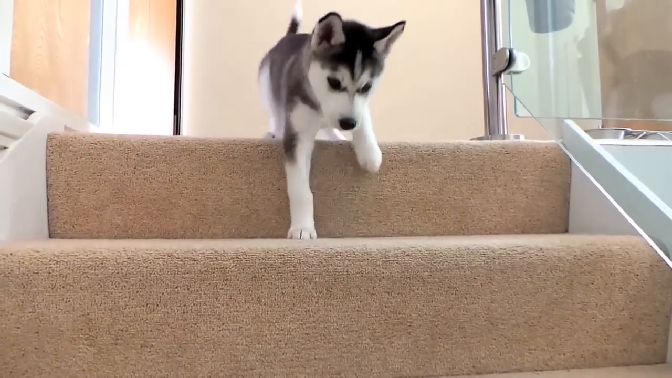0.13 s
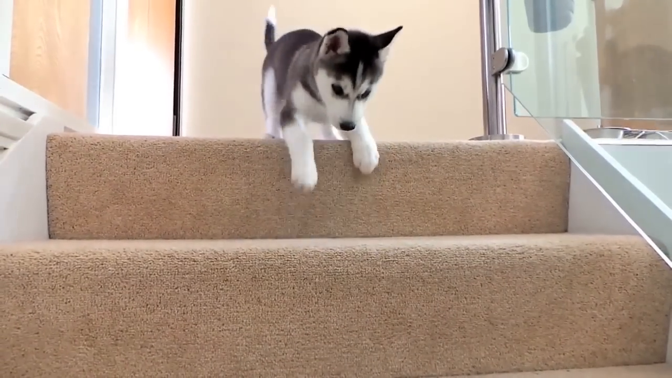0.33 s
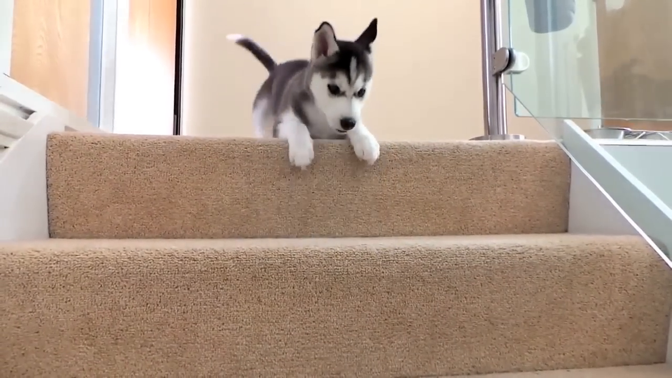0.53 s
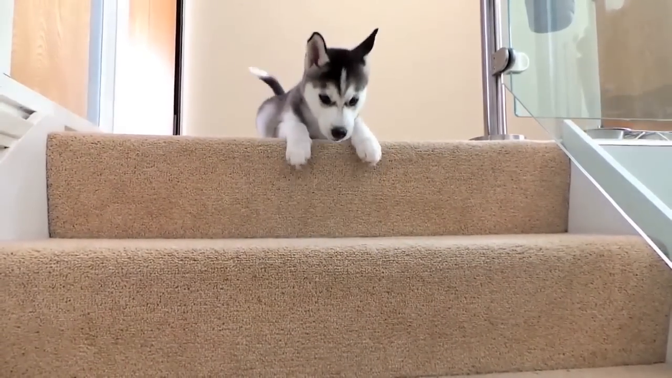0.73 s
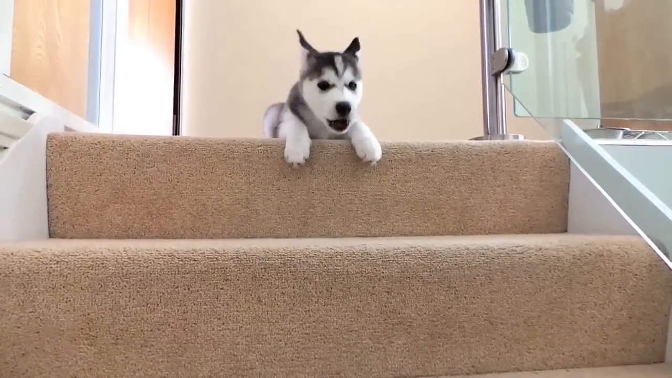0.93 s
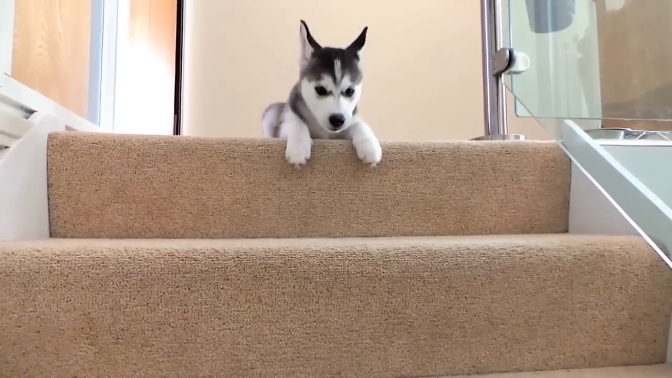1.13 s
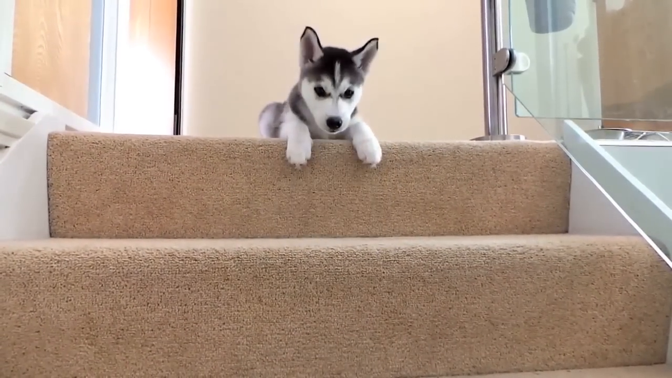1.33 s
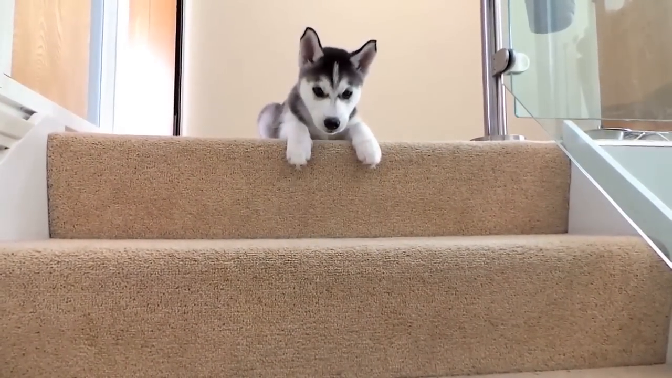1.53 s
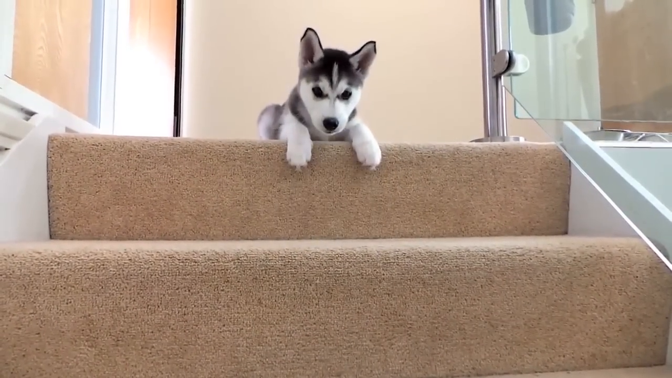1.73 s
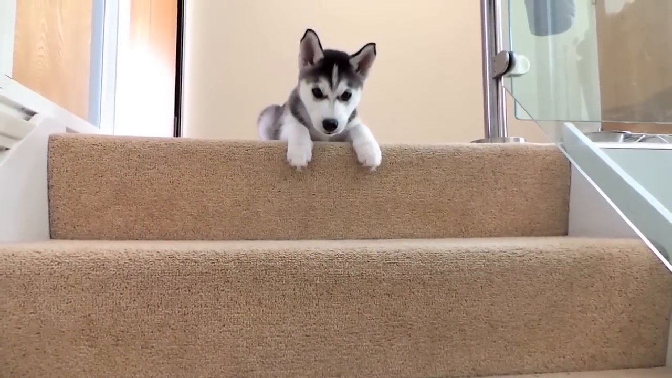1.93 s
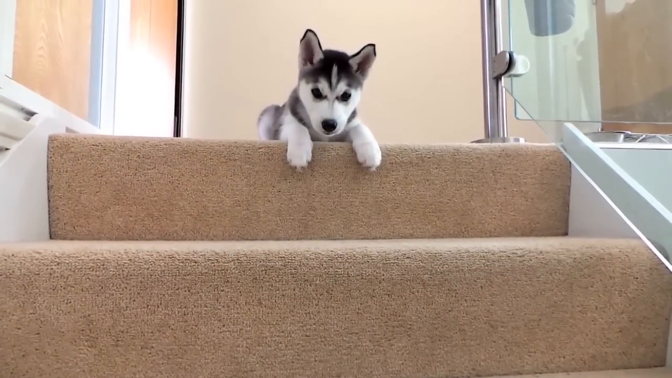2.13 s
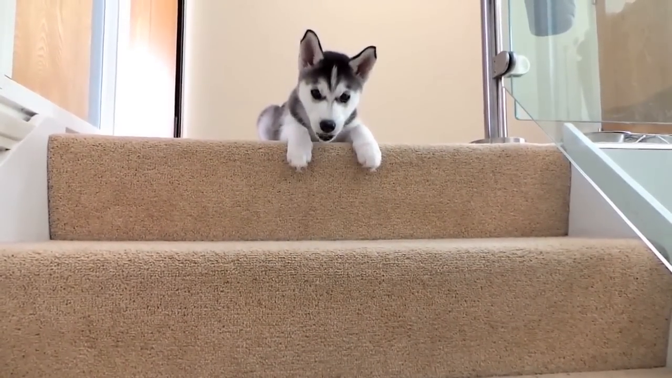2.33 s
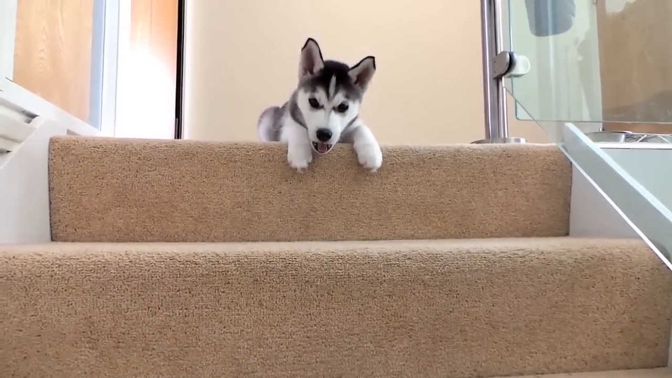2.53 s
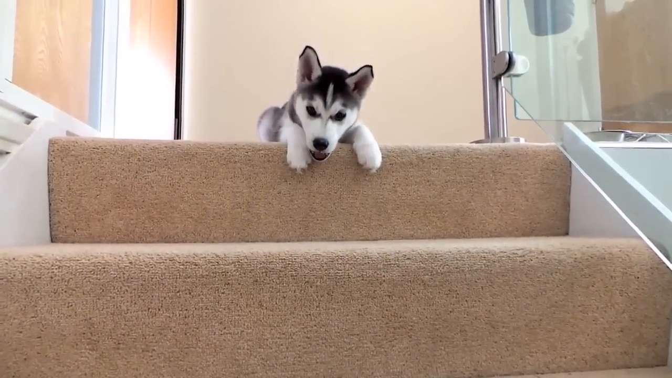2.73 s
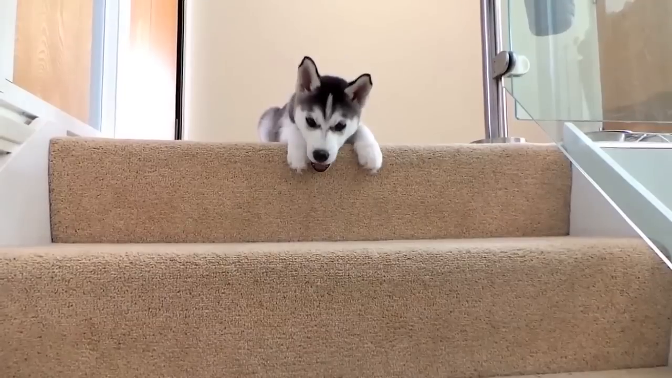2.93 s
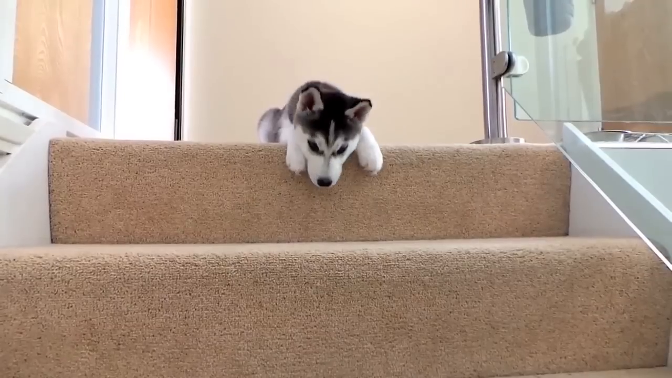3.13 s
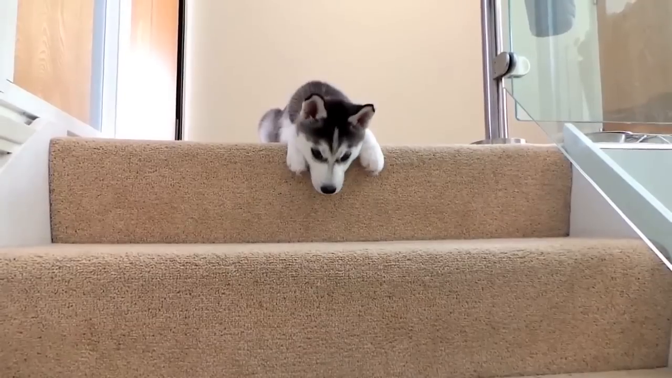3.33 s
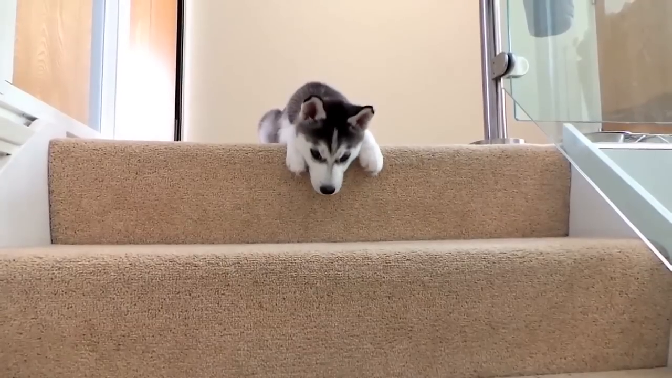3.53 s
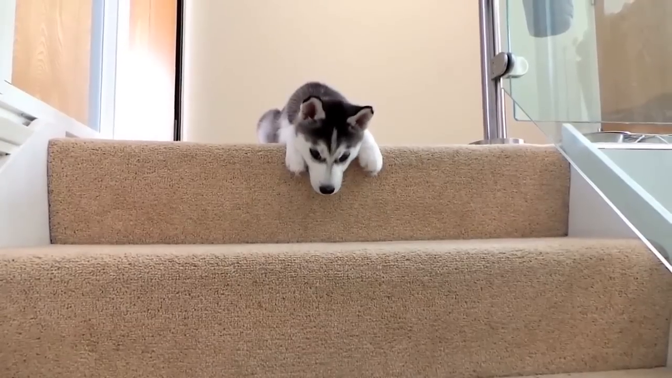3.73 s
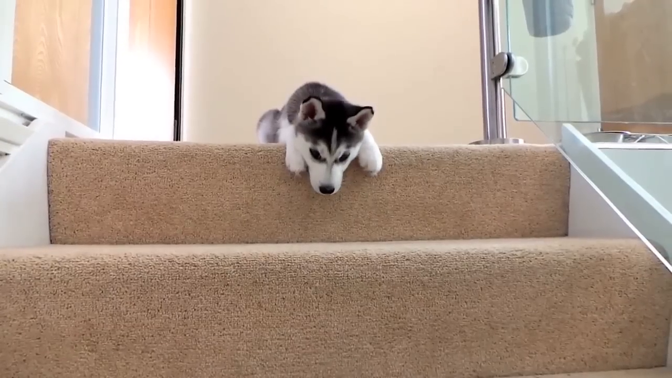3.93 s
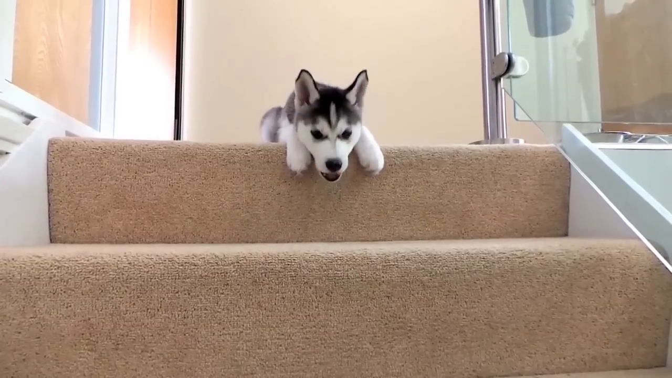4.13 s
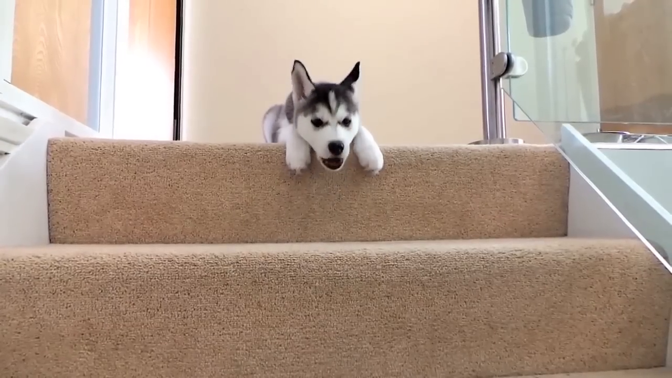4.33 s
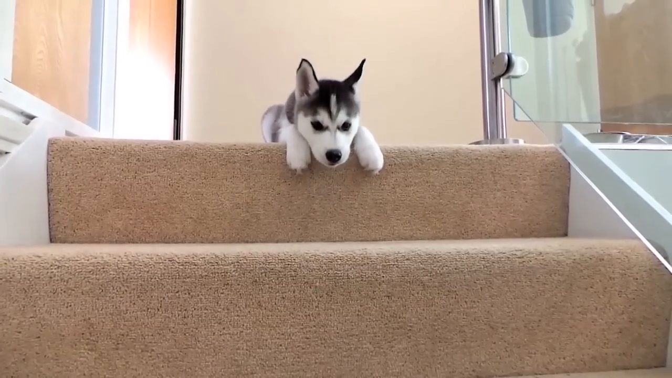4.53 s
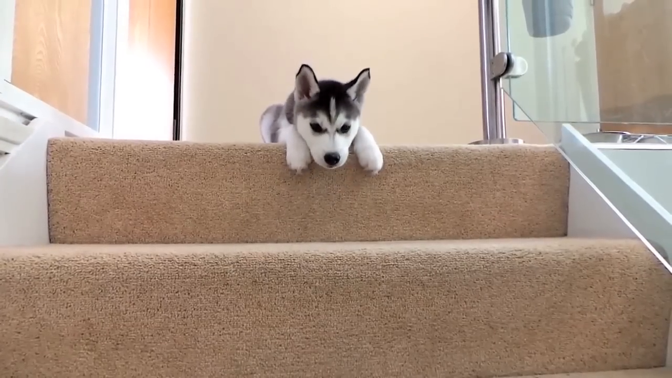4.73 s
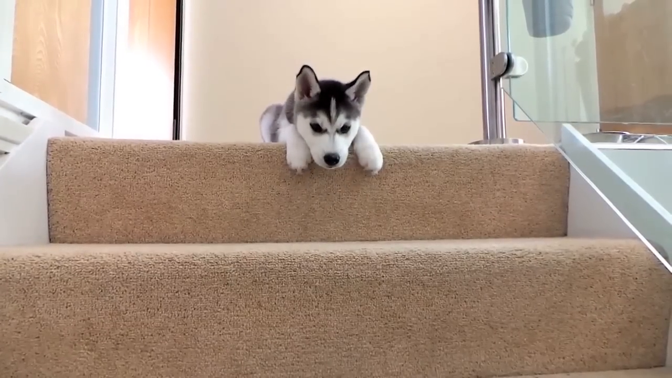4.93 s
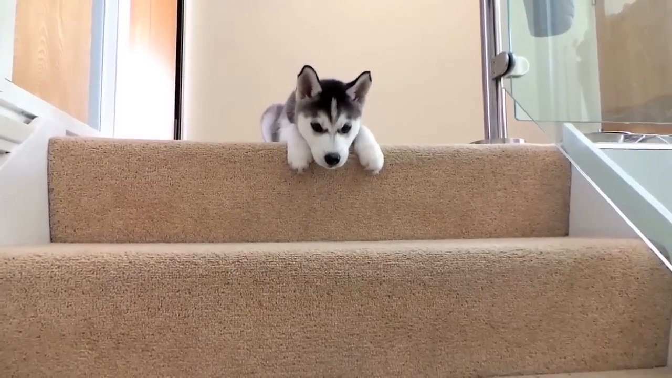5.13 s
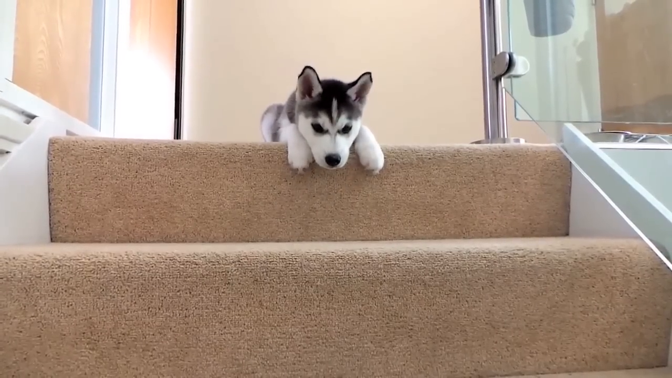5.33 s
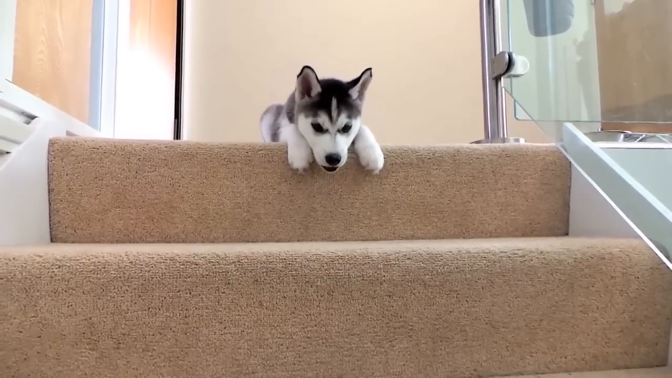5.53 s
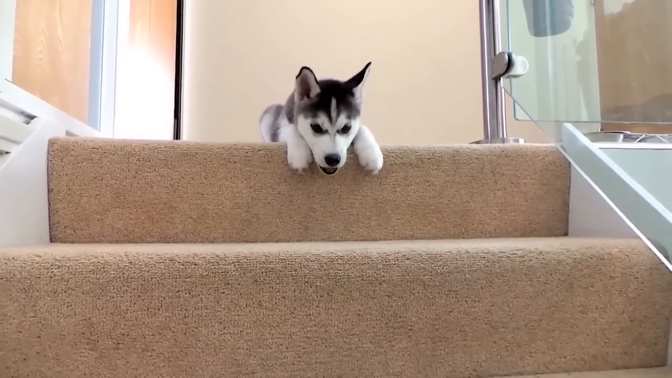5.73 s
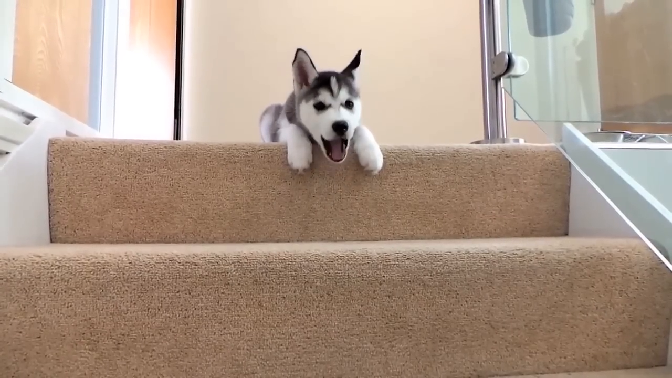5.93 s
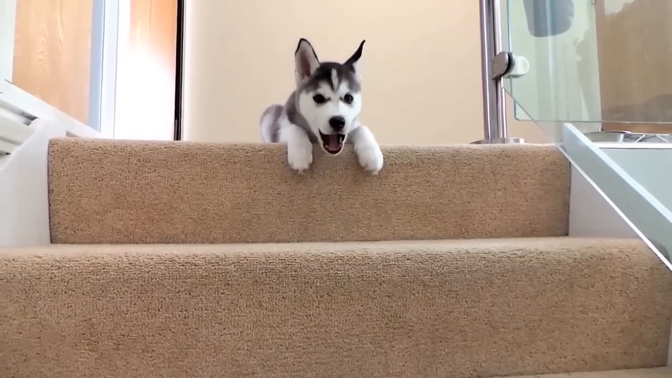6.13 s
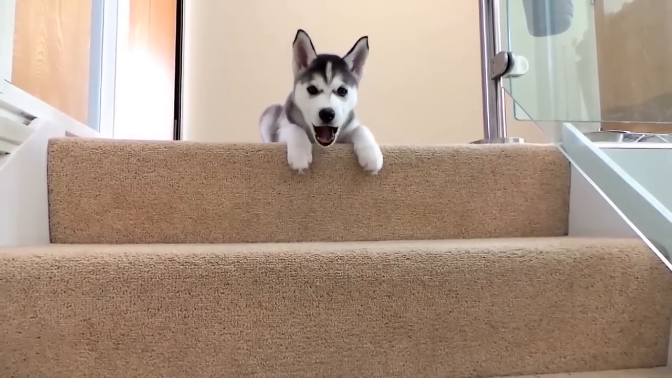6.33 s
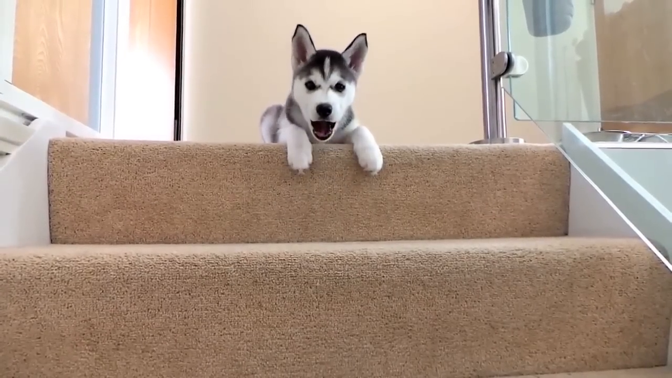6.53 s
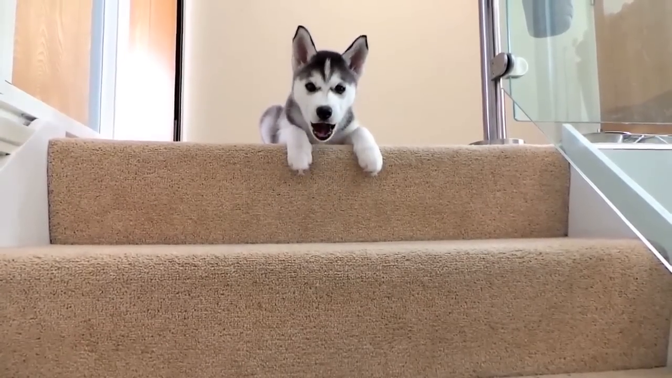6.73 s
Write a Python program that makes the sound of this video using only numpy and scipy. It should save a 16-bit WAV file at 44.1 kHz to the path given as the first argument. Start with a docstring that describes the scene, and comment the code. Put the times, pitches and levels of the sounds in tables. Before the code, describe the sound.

Over quiet indoor air and a faint low hum, a young dog stays nearly silent, paws thumping dully on carpet, then yips once, sharply. Later it squeaks and lets a whine sink in pitch, barks twice in quick succession, pauses, and finishes with wavering yelps and a fading whine. Very thin high whistles ride on the voice; hard stairwell walls add a short ringing tail.

```python
"""Husky puppy in a stairwell

A husky puppy yips and whines at the top of a carpeted stairwell, a few steps above the microphone.
Its voice, a harmonic stack through a moving mouth, rises, breaks into a high register and slides down.
A thin whistle from the larynx, a near-pure oscillator in hiss, rides on top.
Paws thud on the carpet as short noise bursts and the mouth ticks; the bare walls ring with
a few reflections and a noise tail. House air and a faint hum lie under everything."""
import sys
import numpy as np
from scipy import signal
from scipy.fft import rfft, irfft
from scipy.io import wavfile
from scipy.ndimage import uniform_filter1d, minimum_filter1d

SR = 44100
rng = np.random.default_rng(int(sys.argv[2]) if len(sys.argv) > 2 else 0)


def to_wav(s):
    """Save 16-bit WAV."""
    ch = np.atleast_2d(s).T  # columns
    pcm = np.round(np.clip(ch, -1, 1) * 32767)  # PCM
    wavfile.write(sys.argv[1], SR, pcm.astype(np.int16))


N = 303408
T = np.arange(N) / SR
TOP_HZ = 14600  # upper edge of the overtones and of the recorder

# Source levels in these tables are dry, ahead of the mix gains, the stairwell and the recorder.
# colour of the still house air: (f/Hz, relative level/dB per Hz)
AIR_COLOUR = [(15, -49), (25, -18.5), (50, -13.5), (69, -16), (81, -8.5), (101, -8), (150, -6.5),
              (176, -14.5), (363, -14), (404, -18), (3010, -37), (12400, -37), (15000, -37.5)]
# hum lines: (f/Hz, mean level/dB rms)
HUM_LINES = [(49.5, -78.5), (99.2, -60.5), (148, -73.5)]
AIR_DB = -59

# first reflections off steps and side walls: (delay t/s, level/dB)
WALL_REFLECTIONS = [(.0061, -15), (0.0119, -17.5), (0.0187, -14)]
# reverberation of the stairwell: (f/Hz, 60 dB decay t/s)
STAIRWELL_DECAY = [(150, 0.21), (600, 0.44), (1100, 0.45), (3000, 0.38), (6000, 0.43), (9000, 0.33),
                   (13000, 0.58)]

# paws on carpet: (t/s, level/dB, decay t/s)
PAW_FALLS = [(.261, -39.5, 0.015), (.595, -36, 0.036), (4.075, -48.5, .03)]
# colour of a paw fall: (f/Hz, relative level/dB)
PAW_FALL_COLOUR = [(40, -17.5), (100, 0.5), (220, 2), (450, -3.5), (800, -16.5), (1500, -29), (4000, -34),
                   (12000, -48.5)]
# wet ticks of the mouth: (t/s, level/dB, decay t/s)
WET_TICKS = [(4.975, -52.5, 0.0027), (6.685, -49, 0.0037)]

# thin hiss of air under the first whistles: (t/s, level/dB)
THIN_HISS = [(0.0, -55.5), (.31, -64)]
# colour of that hiss: (f/Hz, relative level/dB)
THIN_HISS_COLOUR = [(1000, -13.5), (6500, -13.5), (8000, 1.5), (10500, 1.5), (11500, -11), (14000, -19)]

# short whistles, each a swelling glide: (t/s, length t/s, start f/Hz, end f/Hz, middle level/dB)
SHORT_WHISTLES = [(.005, 0.083, 10180, 10250, -53), (0.137, 0.037, 9840, 10450, -49),
                  (0.251, 0.036, 10500, 10600, -51), (.998, 0.047, 8920, 9000, -37),
                  (1.1, 0.03, 9700, 9230, -57), (4.152, 0.1, 9150, 9000, -35),
                  (4.42, 0.023, 8810, 9140, -30), (5.623, 0.14, 8710, 8150, -42.5),
                  (6.35, .045, 9480, 9160, -57)]
# long wandering whistles, one curve each: (t/s, f/Hz, level/dB)
WANDERING_WHISTLES = [
    [(2.445, 9016, -35), (2.489, 9000, -53), (2.503, 8720, -42), (2.769, 7990, -42), (2.785, 8530, -47),
     (2.837, 8100, -40.5), (2.847, 8770, -45.5), (3.02, 8840, -48)],
    [(5.86, 8770, -48), (5.872, 8795, -45.5), (5.932, 8900, -37.5), (5.944, 8889, -41.5),
     (6.002, 8950, -33), (6.046, 8660, -48.5), (6.066, 8200, -39.5), (6.09, 7990, -43.5)],
]
# colour of the whistle's jet: (f/Hz, relative level/dB)
JET_COLOUR = [(600, -10), (3000, -6.5), (4800, -12), (6600, -3.5), (7400, -3.5), (8400, -7.5),
              (10000, -15.5), (11300, -28.5), (14000, -24)]
WHISTLE_SWELL_DB, LONG_WHISTLE_DB = 2, -1.5
# how deeply the vocal folds modulate the whistle (0-1), once they sound above this level
SIDEBAND_DEPTH, FOLDS_ON_DB = 0.19, -41.5

# throat with the mouth wide for a bark: (f/Hz, gain level/dB)
WIDE_THROAT = [(1000, 0), (1700, 0.5), (2100, -3), (2600, -2.5), (3300, -4), (4100, -7), (4500, -11),
               (5200, -14), (6300, -14), (7600, -17.5), (9500, -25), (11000, -42.5), (14000, -36.5)]
# throat narrowed for a whine: (f/Hz, gain level/dB)
WHINING_THROAT = [(1200, -14), (2000, -0.5), (2600, 5), (3200, 5), (3700, -12.5), (4200, -17.5),
                  (5000, -29), (5700, -8), (6500, -18), (7200, -6.5), (8300, -25.5), (10400, -16.5),
                  (11200, -25.5), (12000, -19), (14500, -12.5)]
# the throat relaxes as the long whine sinks: (t/s, share open 0-1)
THROAT_OPENING = [(3.1, 0), (3.22, 1)]
# resonances of the slack mouth in a grumble: (f/Hz)
SLACK_RESONANCES = [1200, 2900]
# colour of the rasp in the throat: (f/Hz, relative level/dB)
RASP_COLOUR = [(600, -39), (1300, -3.5), (2000, -14), (3100, 0), (4200, -7.5), (5000, -10), (6500, -4),
               (8500, -2), (11000, -30.5), (14000, -25)]
JAW_WIDTH_HZ, JAW_PEAK_DB = 270, 12
# the lower resonance settles as the jaw opens, the upper one peaks at the break
LOWER_WIDE_HZ, UPPER_SHUT_HZ, UPPER_WIDE_HZ = 1720, 2980, 3440
JAW_OPENS_S, JAW_SWING_S = .04, 0.049

# barks: (break t/s, wind-up t/s, fall t/s, start f/Hz, top f/Hz, end f/Hz, fundamental level/dB,
# overtones level/dB, swell level/dB, fade level/dB, roughness 0-1,
# starting lower mouth resonance f/Hz, gape 0-1, overtone tilt level/dB per harmonic)
BARK_CALLS = [(.660, 0.046, 0.025, 660, 1107, 780, -30.5, -50.5, 3, 14, 0.5, 2067, 0.3, 1.3),
              (.970, 0.08, 0.12, 702.8, 1108, 1000, -9.5, -18.5, 48.5, 25.5, .22, 2115, 0.71, -1.06),
              (4.158, .045, .125, 626.7, 1135, 720, -12.5, -15, 6, 24.5, .22, 1230, 1.0, -0.5),
              (4.407, .1, 0.087, 676.6, 1057, 800, -9.5, -13, 19, 26.5, .22, 2050, 0.26, -1.26)]
BREAK_S = .005  # the voice passes from one register into the other
LEAP_RATIO = 1.25  # pitch jump from the low register to the top
# the climb of the wind-up is partly steady, partly a late rush
STEADY_CLIMB_SHARE, RUSH_POWER = .42, 3.9
# the wind-up is cleaner, and its fundamental is weak and grows with the swell
WINDUP_ROUGH_SHARE, WINDUP_WEAK_DB = .28, -9.5
WINDUP_GROWTH_DB, WINDUP_SWELL_SHARE = 9.5, 0.25
# past the break the overtones step down and fade less than the fundamental
BREAK_OVERTONES_DB, OVERTONE_FADE_SHARE = -11, 0.66

# high squeaks and yelps: (t/s, length t/s, start f/Hz, aimed f/Hz, end f/Hz, fundamental level/dB,
# overtones level/dB, fade level/dB, negative grows, roughness 0-1, overtone tilt level/dB per harmonic)
SQUEAK_NOTES = [(1.006, 0.025, 1407, 1476, 1451, -19.5, -19, 0.5, 0.07, -8),
                (2.454, 0.039, 1655, 1855, 1833, -28, -31, 6, 0.09, -1.8),
                (5.641, 0.088, 1627, 1708, 1600, -30.5, -31.5, 19.5, 0.09, -2),
                (5.764, 0.034, 1418, 1410, 1445, -34.5, -46.5, -3, 0.2, -4),
                (5.855, 0.1, 1278, 1658, 1565, -23, -26.5, -2, 0.06, -3),
                (5.947, .115, 1307, 1680, 1514, -15.5, -19.5, 11.5, 0.08, -2.5),
                (6.166, 0.21, 1176, 1122, 1059, -24.5, -47.5, 18.5, 0.02, -0.5)]
# low grumbles after the barks, same columns as the squeaks
GRUMBLE_NOTES = [(.708, 0.055, 749, 786, 829, -42.5, -55.5, 8, .22, 1),
                 (.795, 0.078, 759, 814.6, 854.4, -44.5, -67.5, -4, 0.15, 1),
                 (4.499, 0.065, 602.5, 499, 490, -38, -37.5, -3, .09, -2.3)]
# a note scoops towards its aimed pitch, drifts off ever faster and changes level late
SCOOP_S, DRIFT_POWER, NOTE_FADE_POWER, NOTE_OVERTONE_FADE_DB = .05, 2.1, 2.8, 5.5
# the fundamental swells as it passes the lowest resonance of the narrowed mouth
VOWEL_HZ, VOWEL_WIDTH_HZ, VOWEL_DB = 1316, 32, 11

# long sliding whine: (t/s, f/Hz, fundamental level/dB, overtones level/dB)
SLIDING_WHINE = [(2.859, 1338, -14.5, -35.5), (2.881, 1452, -26.5, -33), (2.901, 1588, -22, -27),
                 (2.932, 1512, -24, -31), (2.965, 1517, -17.5, -28), (3.001, 1427, -25.5, -40),
                 (3.041, 1248, -10.5, -34), (3.151, 1111, -24.5, -49.5), (3.24, 957, -30, -44),
                 (3.32, 839, -44, -58), (3.384, 727, -50, -88)]
# the whine is roughest where it is low: (f/Hz, roughness 0-1)
ROUGHNESS_BY_PITCH = [(780, 0.2), (1000, .04), (1200, 0), (1550, .06)]


def undb(db):
    """Decibels to gain."""
    return 10 ** (np.asarray(db) / 20)


def lookup(hz, points):
    """Read (f/Hz, value) points on a log-frequency axis."""
    f, value = np.transpose(points)
    return np.interp(np.log(np.maximum(hz, 1)), np.log(f), value)


def noise(colour, size):
    """Unit-rms noise with a (f/Hz, level/dB) colour."""
    gain = undb(lookup(np.fft.rfftfreq(size, 1 / SR), colour))
    x = irfft(rfft(rng.standard_normal(size)) * gain, size)
    return x / x.std()


def wobble(rate, size):
    """Smooth random motion of unit spread, up to about `rate` Hz."""
    lowpass = signal.butter(2, rate, fs=SR, output="sos")
    x = signal.sosfilt(lowpass, rng.standard_normal(size + 4096))[4096:]  # drop the filter's start
    return x / x.std()


def phrase(rows, attack, release):
    """Sample indices, on-off gate and control curves of one phrase."""
    s, *columns = np.transpose(rows)
    first = max(int((s[0] - attack) * SR), 0)
    last = min(int((s[-1] + release) * SR), N)
    span = np.arange(first, last)
    t = T[span]
    rise = np.clip((t - s[0]) / attack + 1, 0, 1)
    drop = np.clip((s[-1] - t) / release + 1, 0, 1)
    gate = np.sin(rise * drop * np.pi / 2) ** 2
    return span, gate, [np.interp(t, s, column) for column in columns]


def background(waver_db=2.0):
    """Still house air as coloured noise, and a mains hum of sines that waver slightly in level."""
    hum = 0
    for hz, db in HUM_LINES:
        level = undb(db + waver_db * wobble(5, N))
        hum = hum + level * np.sqrt(2) * np.sin(2 * np.pi * (hz * T + rng.random()))
    return hum + undb(AIR_DB) * noise(AIR_COLOUR, N)


def stairwell(x, tail_db=-4, build_s=0.0021, treble_db=-3):
    """Direct sound, a few hard reflections, then a dense tail whose bands die at their own rates."""
    t = T[:SR]
    hz = np.fft.rfftfreq(SR, 1 / SR)
    scatter = rfft(rng.standard_normal(SR))
    centres = np.transpose(STAIRWELL_DECAY)[0]
    treble_cut = undb(lookup(hz, [(3000, 0.001), (9000, treble_db)]))
    response = np.zeros(SR)
    for share, (_, t60) in zip(np.eye(len(centres)), STAIRWELL_DECAY):
        band = lookup(hz, np.c_[centres, share]) * treble_cut
        response += irfft(scatter * band, SR) * np.exp(-np.log(1000) * t / t60)
    response *= 1 - np.exp(-(t / build_s) ** 2)  # the tail builds up
    response *= undb(tail_db) / np.sqrt(np.sum(response ** 2))
    response[0] += 1
    for delay, db in WALL_REFLECTIONS:
        response[int(delay * SR)] += undb(db)
    return signal.fftconvolve(x, response)[:N]


def taps(rows, colour):
    """Soft contacts: dead, quickly fading bursts of coloured noise."""
    envelope = sum(undb(db) * (T >= s) * np.exp(-np.abs(T - s) / decay) for s, db, decay in rows)
    return uniform_filter1d(envelope, size=64) * noise(colour, N)


def air_hiss():
    """A thin hiss of air, coloured noise that sinks slowly in level."""
    span, gate, (db,) = phrase(THIN_HISS, attack=.01, release=.02)
    out = np.zeros(N)
    out[span] = gate * undb(db) * noise(THIN_HISS_COLOUR, len(span))
    return out


def whistle(rows, waver=0.0028, flutter_db=1.0, hiss_db=-17):
    """A second, near-pure oscillator far above the voice, in a little hiss of its own jet."""
    span, gate, (hz, db) = phrase(rows, attack=0.0029, release=.012)
    size = len(span)
    wavering_hz = hz * (1 + waver * wobble(120, size))
    tone = np.sqrt(2) * np.sin(2 * np.pi * np.cumsum(wavering_hz) / SR)
    hiss = noise(JET_COLOUR, size)
    level = undb(db + flutter_db * wobble(61, size))
    out = np.zeros(N)
    out[span] = gate * level * (tone + undb(hiss_db) * hiss)
    return out


def glide(s, length_s, start_hz, end_hz, db):
    """Controls of one short whistle, loudest in its middle."""
    edge_db = db - WHISTLE_SWELL_DB
    return [(s, start_hz, edge_db),
            (s + length_s / 2, (start_hz + end_hz) / 2, db),
            (s + length_s, end_hz, edge_db)]


def whistling(voiced):
    """All whistles; the vocal folds chop their air stream, which adds sidebands above and below."""
    tones = sum(whistle(glide(*row)) for row in SHORT_WHISTLES)
    tones = tones + undb(LONG_WHISTLE_DB) * sum(whistle(rows) for rows in WANDERING_WHISTLES)
    # level the voice out, so that only its waveform modulates
    power = uniform_filter1d(voiced ** 2, size=256)
    folds = voiced / np.sqrt(2 * power + undb(FOLDS_ON_DB) ** 2)
    return tones * (1 + SIDEBAND_DEPTH * folds)


def narrow_mouth(hz, t):
    """Gain in dB of the whining mouth, which holds still."""
    return lookup(hz, WHINING_THROAT)


def relaxing_mouth(hz, t):
    """Gain in dB of the mouth as it goes from narrow to open in the long whine."""
    share = np.clip(np.interp(t, *np.transpose(THROAT_OPENING)), 0, 1)
    return (1 - share) * lookup(hz, WHINING_THROAT) + share * lookup(hz, WIDE_THROAT)


def open_mouth(hz, resonances_hz):
    """Gain in dB of the open mouth: resonances stand on the throat's slope."""
    peaks = sum(1 / (1 + ((hz - centre) / JAW_WIDTH_HZ) ** 2) for centre in resonances_hz)
    return lookup(hz, WIDE_THROAT) + JAW_PEAK_DB * peaks


def grumbling_mouth(hz, t):
    """Gain in dB of the slack, still mouth."""
    return open_mouth(hz, SLACK_RESONANCES)


def barking_mouth(s, start_hz, gape):
    """The mouth of a bark that breaks at s; both resonances move with the jaw."""
    def gain_db(hz, t):
        lower = np.interp(t, [s - JAW_OPENS_S, s], [start_hz, LOWER_WIDE_HZ])
        swing = gape * np.exp(-((t - s) / JAW_SWING_S) ** 2)
        upper = UPPER_SHUT_HZ + (UPPER_WIDE_HZ - UPPER_SHUT_HZ) * swing
        return open_mouth(hz, [lower, upper])
    return gain_db


def long_whine():
    """Controls of the sliding whine, whose roughness follows its pitch."""
    rows = np.array(SLIDING_WHINE)
    return np.c_[rows, lookup(rows[:, 1], ROUGHNESS_BY_PITCH)]


def note(s, length_s, start_hz, aimed_hz, end_hz, low_db, over_db, fade_db, rough):
    """Controls of one squeak or grumble: pitch scoop, late drift and change of level."""
    u = np.linspace(0, 1, 60)
    scoop = np.sin(np.minimum(u * length_s / SCOOP_S, 1) * np.pi / 2) ** 2
    hz = start_hz + (aimed_hz - start_hz) * scoop + (end_hz - aimed_hz) * u ** DRIFT_POWER
    faded_db = fade_db * u ** NOTE_FADE_POWER
    vowel_db = VOWEL_DB / (1 + ((hz - VOWEL_HZ) / VOWEL_WIDTH_HZ) ** 2)
    return np.c_[s + length_s * u, hz, low_db + vowel_db - faded_db,
                 over_db - faded_db - NOTE_OVERTONE_FADE_DB * u, np.full_like(u, rough)]


def bark(s, windup_s, fall_s, start_hz, top_hz, end_hz, low_db, over_db, swell_db, fade_db, rough):
    """Controls of one bark: a rising wind-up, a break into the high register, a fading fall."""
    u = np.linspace(0, 1, 25)
    climb = STEADY_CLIMB_SHARE * u + (1 - STEADY_CLIMB_SHARE) * u ** RUSH_POWER
    growth_db = WINDUP_GROWTH_DB + WINDUP_SWELL_SHARE * swell_db
    windup = np.c_[s - windup_s + (windup_s - BREAK_S) * u,
                   start_hz + (top_hz / LEAP_RATIO - start_hz) * climb,
                   low_db + WINDUP_WEAK_DB - growth_db * (1 - u ** 2),
                   over_db - swell_db * (1 - u),
                   rough * (WINDUP_ROUGH_SHARE + (1 - WINDUP_ROUGH_SHARE) * u ** 20)]
    faded_db = fade_db * u
    fall = np.c_[s + fall_s * u,
                 top_hz + (end_hz - top_hz) * u ** 2,
                 low_db - faded_db,
                 over_db + BREAK_OVERTONES_DB - OVERTONE_FADE_SHARE * faded_db,
                 np.full_like(u, rough)]
    return np.r_[windup, fall]


def voice(rows, mouth, jitter, shimmer, rasp_db, flicker_db, tilt_db):
    """Vocal folds sound a harmonic stack through the mouth; strain shakes pitch and size and adds rasp."""
    span, gate, (hz, low_db, over_db, rough) = phrase(rows, attack=0.012, release=0.014)
    size = len(span)
    rough = np.clip(rough, .03, 1)
    phase = 2 * np.pi * np.cumsum(hz * (1 + jitter * rough * wobble(190, size))) / SR
    fundamental = np.sqrt(2) * np.sin(phase)
    order = np.arange(2, 21)[:, None]
    # the folds never close twice alike, so each overtone comes and goes
    flicker = np.array([wobble(32, size) for _ in order])
    source_db = flicker_db * flicker + tilt_db * order
    weight = undb(mouth(order * hz, T[span]) + source_db) * (order * hz < TOP_HZ)
    # the stack is held at unit rms: the mouth sets its colour, over_db its level
    stack = (weight * np.sin(order * phase)).sum(0)
    overtones = np.sqrt(2) * stack / np.sqrt((weight ** 2).sum(0))
    # turbulence puffs once a cycle and has little bass
    rasp = undb(rasp_db) * rough * noise(RASP_COLOUR, size) * (1 + .5 * np.cos(phase))
    swing = 1 + rough * shimmer * wobble(100, size)
    out = np.zeros(N)
    out[span] = gate * swing * (undb(low_db) * fundamental + undb(over_db) * (overtones + rasp))
    return out


def scene(bark_db=4.0, whine_db=0, whistle_db=0.5):
    """The puppy in the stairwell, over the hum."""
    open_calls = [(bark(*row), barking_mouth(row[0], start_hz, gape), tilt)
                  for *row, start_hz, gape, tilt in BARK_CALLS]
    open_calls += [(note(*row), grumbling_mouth, tilt) for *row, tilt in GRUMBLE_NOTES]
    narrow_calls = [(note(*row), narrow_mouth, tilt) for *row, tilt in SQUEAK_NOTES]
    narrow_calls += [(long_whine(), relaxing_mouth, -1.04)]
    barks = sum(voice(rows, mouth, jitter=0.054, shimmer=0.8, rasp_db=-11.5, flicker_db=5, tilt_db=tilt)
                for rows, mouth, tilt in open_calls)
    whines = sum(voice(rows, mouth, jitter=0.057, shimmer=0.19, rasp_db=2, flicker_db=4.5, tilt_db=tilt)
                 for rows, mouth, tilt in narrow_calls)
    voiced = undb(bark_db) * barks + undb(whine_db) * whines
    puppy = voiced + undb(whistle_db) * whistling(voiced) + air_hiss()
    puppy += taps(PAW_FALLS, PAW_FALL_COLOUR)
    puppy += taps(WET_TICKS, [(300, 9), (1200, 8), (5000, -7.0), (12000, -15)])
    return (stairwell(puppy) + background())[None]


def limiter(x, ceiling=.9):
    """Turn the gain down smoothly around peaks that would overload."""
    gain = ceiling / np.maximum(np.abs(x), ceiling)
    return x * uniform_filter1d(minimum_filter1d(gain, size=256), size=256)


def record(dry, threshold_db=-50, knee_db=10, depth_db=8, memory_s=0.025):
    """A gentle expander opens fast and sinks slower in the quiet; peaks are limited, the top is cut."""
    keep = np.exp(-1 / (memory_s * SR))
    power = signal.lfilter([1 - keep], [1, -keep], dry ** 2)
    level_db = 10 * np.log10(power + 1e-12)
    closed = np.clip((threshold_db - level_db) / knee_db + .5, 0, 1)
    expanded = dry * undb(-depth_db * closed)
    top_cut = signal.ellip(10, .2, 80, TOP_HZ, fs=SR, output="sos")
    return signal.sosfilt(top_cut, limiter(expanded))


dry = scene()
out = record(dry)
to_wav(out)
```